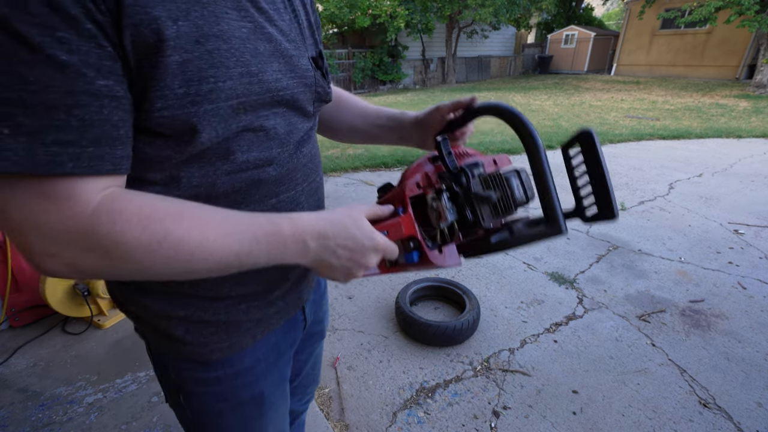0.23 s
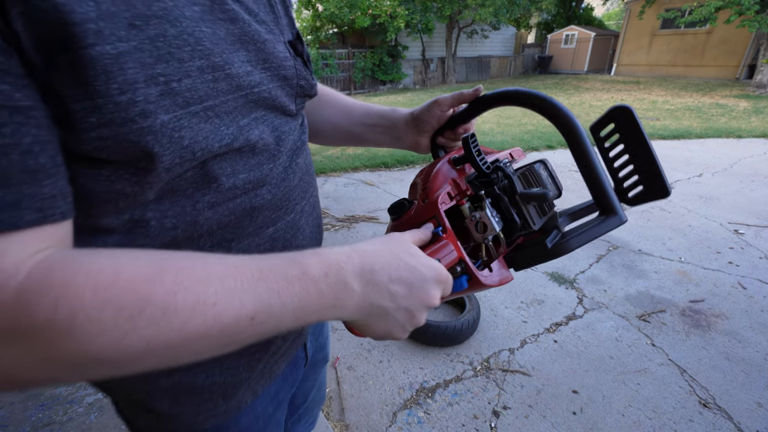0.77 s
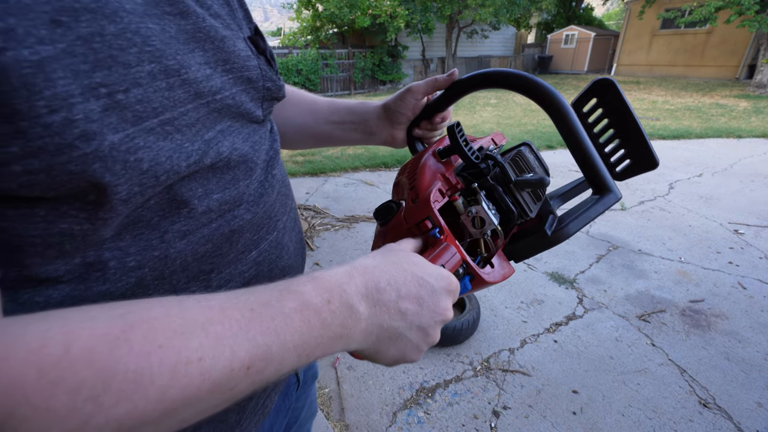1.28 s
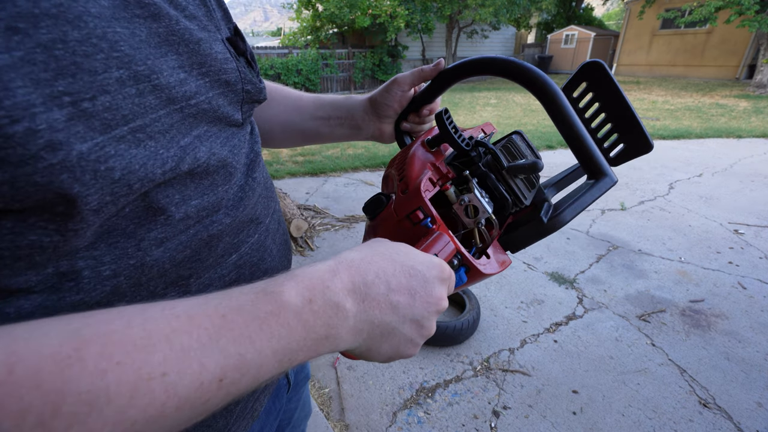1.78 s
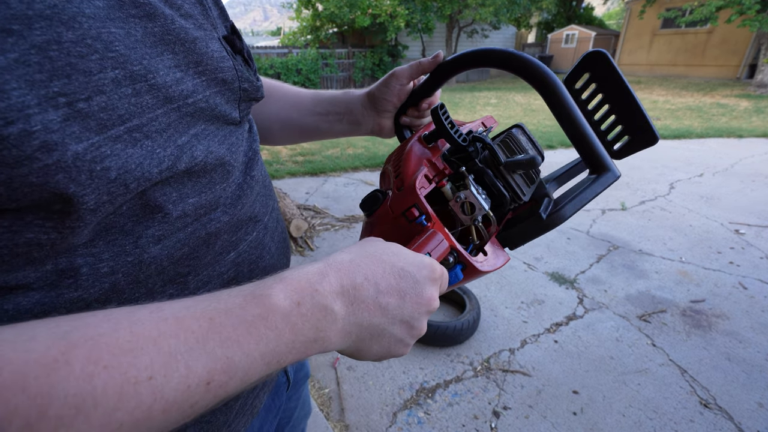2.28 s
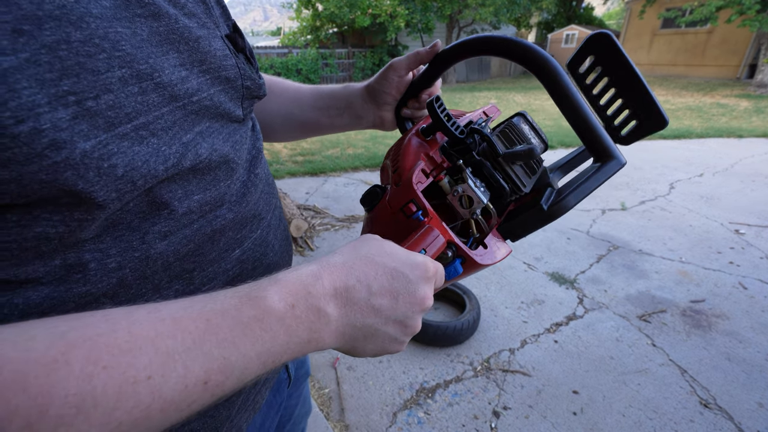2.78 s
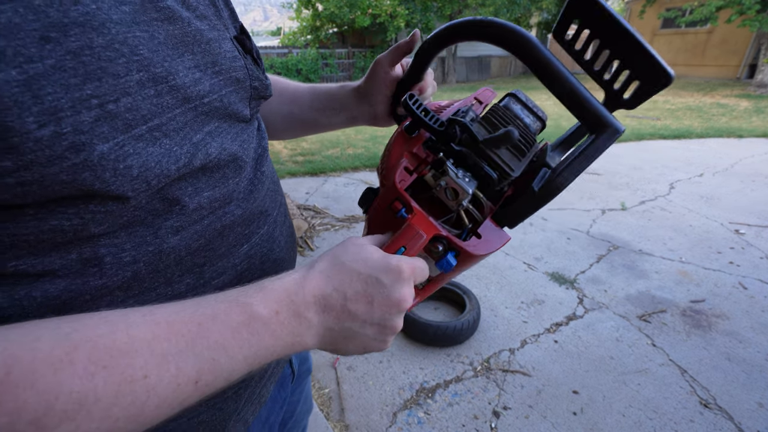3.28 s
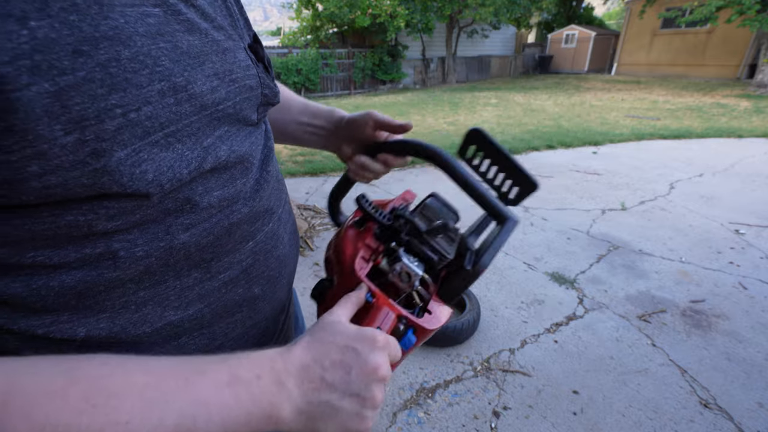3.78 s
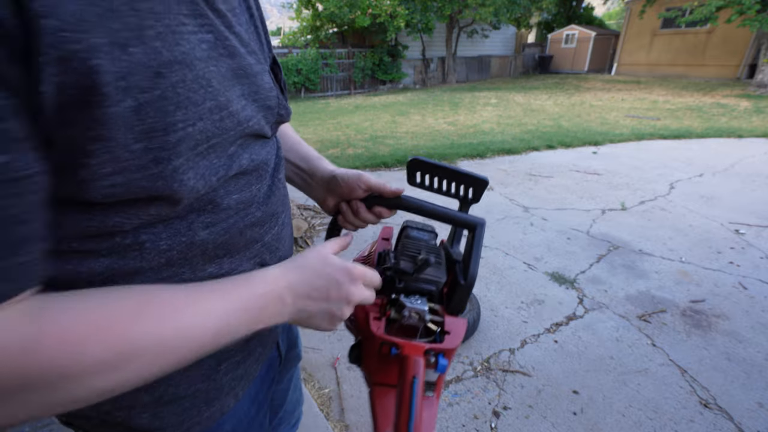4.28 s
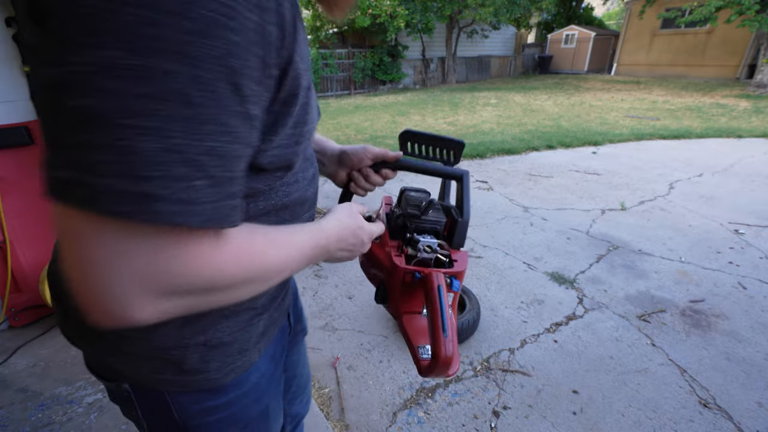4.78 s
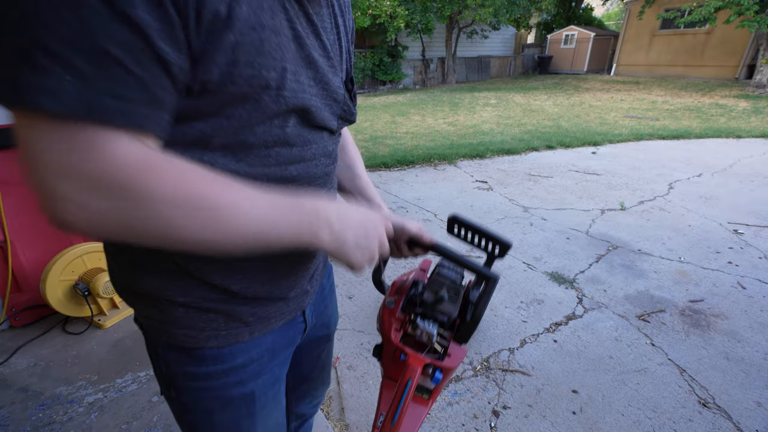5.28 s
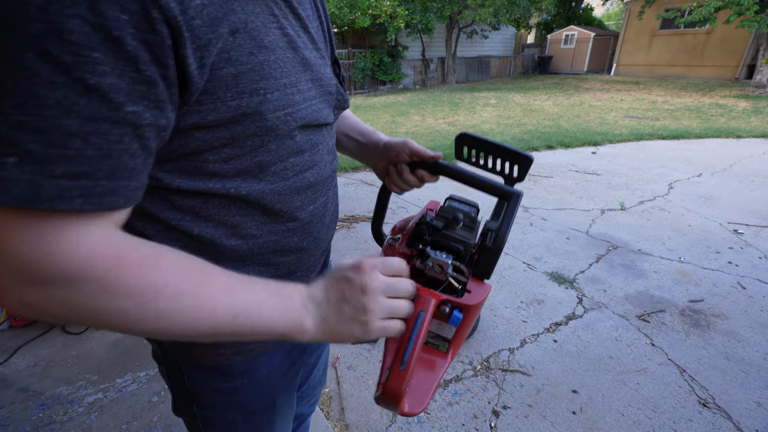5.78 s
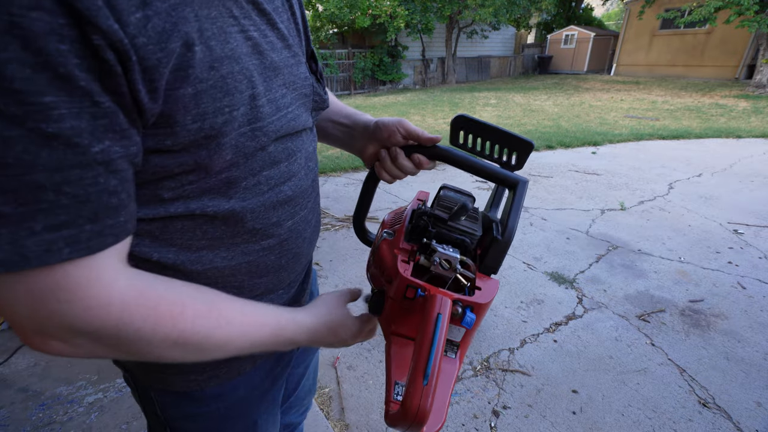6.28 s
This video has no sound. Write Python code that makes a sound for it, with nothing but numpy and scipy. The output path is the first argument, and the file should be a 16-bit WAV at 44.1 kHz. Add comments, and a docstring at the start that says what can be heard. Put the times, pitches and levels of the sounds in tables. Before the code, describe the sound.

Close up in a yard, a small two-stroke engine runs at a fast, buzzing, uneven idle with skipped beats and a rattling casing. The spark is cut; it slows, knocking and puffing, and stops in a clatter of steel with a faint ringing. Quiet handling follows, with a sharp switch click. Then one rasping cord pull starts it again at a slower, rougher idle.

```python
"""A small two-stroke chainsaw without its bar, hand-held over a concrete drive, idles fast and unevenly:
exhaust pulses excite the muffler, shaking parts rattle as filtered noise, the piston hums at crank harmonics.
With the spark cut it coasts down knocking at compression; steel blows clatter and the drum's modes ring on.
Hands slide and knock (noise swells and bursts) and the switch snaps back with a click of filtered noise.
One pull of the cord rasps as gritty noise, the engine catches weakly and idles again, slower."""
import sys
import numpy as np
from scipy import signal
from scipy.fft import rfft, irfft
from scipy.io import wavfile

SR = 44100
rng = np.random.default_rng(int(sys.argv[2]) if len(sys.argv) > 2 else 0)


def waveform_to_disk(signal):
    """Save audio, clipped to [-1, 1], as 16-bit WAV at the path in sys.argv[1]."""
    frames = np.transpose(np.atleast_2d(signal))
    scaled = np.clip(frames, -1, 1) * 32767
    samples = np.round(scaled).astype(np.int16)
    wavfile.write(sys.argv[1], SR, samples)


N = 288414
TIME = np.arange(N) / SR

# instants at which the spark is cut and comes back [s]
IGNITION_OFF, IGNITION_ON = 1.358, 5.01
# first run: the idle sags slowly; without spark, friction brakes the crank ever harder until it stalls
IDLE_HZ, SAG_HZ_PER_S, BRAKE_HZ_PER_S, BRAKE_HZ_PER_S2 = 73.71, 2.587, 65.0, 5.6
FIRST_PORT_S, STALL_S = .0029, 2.025
# second run: the cord spins the crank up to the first burn; it then settles on an idle that creeps upward
PULL_S, FIRST_BURN_S, CATCH_HZ = .0775, 5.0161, 40.4
SETTLE_S, RESTART_IDLE_HZ, CREEP_HZ_PER_S = .1, 58.36, 3.376
# on restarting, burns stay weak below one crank speed and reach full strength at another
WEAK_BELOW_HZ, FULL_ABOVE_HZ, WEAK_DB = 54, 61.1, -4
# a burn just before a stumble loses vigour; per unit of vigour lost, a burn comes later and sounds lower
SLUGGISH, LATE_S, COOLING = 1.3, 0.00017, 0.051
# the rattle grows as a power of crank speed and eases without spark; slack parts knock between two speeds
RATTLE_POWER, RATTLE_COAST_DB, KNOCK_BELOW_HZ, KNOCK_ABOVE_HZ = 1.06, -0.94, 71, 23.5
CLANK_DECAY_S = 0.0095
# the drum is stirred as the crank rocks backward and struck hard as it comes to rest
STIR_S, REST_S, DRUM_STIR_DB, DRUM_STRIKE_DB, DRUM_BEAT_HZ = 2.13, 2.2, -44, -38, 15.6
# the cord swells as it is pulled, holds, and fades as it winds back
CORD_FULL_S, CORD_HOLD_S, CORD_DB = 4.972, .12, -23.5
CORD_RISE_DB_PER_S, CORD_FADE_DB_PER_S = 446, 75
YARD_DB, TOP_HZ = -63.5, 15750

# Spectral outlines of sounds: (frequency [Hz], relative level [dB])
# the muffler's bang in the fast and in the slower idle
FAST_BANG = [(70, -32), (140, -27), (240, -7.5), (400, -3), (600, -5), (760, -0.5), (1030, -4), (1220, -17),
             (2000, -23), (3200, -35), (6000, -45), (15000, -64)]
SLOW_BANG = [(70, -29.5), (190, -7.5), (330, -6), (600, -4), (760, -1), (930, -2.5), (1150, -20.5),
             (2000, -22), (6000, -50), (15000, -71)]
# air sucked or puffed at the port
PUFF = [(50, -32.5), (110, -14), (190, -2.5), (330, 4), (600, -6), (900, 4.5), (1300, -13.5), (2500, -22.5),
        (15000, -59)]
# turbulent exhaust flow
GAS = [(110, -24), (230, 4), (350, -0.5), (950, 1), (1400, -13.5), (2500, -39.5)]
# spitting of the burns and sharp cracks of the running engine
CRACK = [(500, -8.5), (2400, 3), (4000, -9.5), (7000, -17), (11000, -14), (15000, -35)]
# broad rattle of clutch and casing in each run
FIRST_CASING = [(400, -18), (1200, 0.5), (1950, -1.5), (2700, -7.5), (3980, -9), (4700, -4.5),
                (5100, -12.5), (5900, -12.5), (6870, -25.5), (10700, -33), (15500, -44)]
SECOND_CASING = [(400, -16.5), (1200, 1.5), (2000, -3.5), (2430, -5), (3080, -0.5), (3500, -7.5),
                 (5200, -7), (6240, -9.5), (6870, -20), (10700, -31), (15500, -64)]
# slack parts at compression
KNOCK = [(200, -21), (700, -4), (1200, -9), (1800, 0.5), (2300, -10.5), (3000, -16), (4200, -19.5),
         (7000, -30), (15000, -45)]
# blows on steel
STEEL = [(150, -17), (400, -4.5), (1000, -3), (1900, 5), (3000, 0), (4200, 3), (5500, -5.5), (7500, -12.5),
         (10000, -13), (12300, -9.5), (15500, -18)]
# knocks on the housing
CLUNK = [(150, -25), (350, -8), (700, -7), (1200, -0.5), (1600, -2), (2100, -2), (3500, -11.5), (7000, -22),
         (15000, -42.5)]
# hand sliding on plastic
SCUFF = [(700, -5), (1500, 1.5), (3600, 0.5), (6000, -8), (12000, -23)]
# the switch
SWITCH = [(400, -43), (1100, -19), (1700, -11), (2050, 0), (3100, -8.5), (3900, -5), (6000, -1.5),
          (7600, -16.5), (15000, -34)]
# the starter cord
CORD = [(70, -19.5), (190, -4.5), (800, -3.5), (1160, -5), (1750, 3), (2300, -9.5), (3300, -13.5),
        (9300, -26), (15000, -38)]
# quiet outdoor background
YARD = [(30, -14), (122, 0), (700, -4), (1730, -10.5), (2700, -18), (4100, -20), (15000, -34.5)]

# casing resonances: (frequency [Hz], width [Hz], relative level [dB])
CASING_MODES = [(2063, 170, -1), (3100, 180, -8.5), (4730, 32, 4.5), (6400, 22, 0), (7400, 140, 4),
                (10470, 450, 3)]
# clutch drum modes: (frequency [Hz], relative level [dB], t60 [s], strength of the beating twin [0-1])
DRUM_MODES = [(1224, -1.5, 0.55, 0.5), (2309, -4.5, 2.7, 0.64), (4020, 3.5, 0.37, 0), (4360, 2, .24, .1),
              (4511, 3, .57, .1), (5215, 8.5, .16, .1), (6970, -21.5, 1.3, 0.8), (12420, -5, .2, .2)]
# stumbles of both idles: (time [s], length [turns without a burn])
STUMBLES = [(.195, 1), (.304, 1), (.373, 1), (.483, 1), (.565, 2), (.635, 1), (.828, 1), (.899, 1),
            (1.125, 1), (1.209, 1), (5.214, 1), (5.386, 2), (5.486, 1), (5.569, 1), (5.85, 1), (5.899, 2),
            (5.964, 1), (6.029, 2), (6.349, 1), (6.445, 3), (6.523, 1)]
# steel blows as the engine stops, and one faint metal clink during handling:
# (time [s], crack level [dB], ring frequency [Hz], ring level [dB], ring decay [s])
CLANKS = [(2.028, -15.5, 4050, -23, 0.022), (2.068, -28, 1680, -16.5, 0.014), (2.079, -21, 4360, -24, .018),
          (2.088, -24.5, 2000, -12, 0.0043), (2.108, -20.5, 2500, -15.5, .004),
          (2.119, -18.5, 5260, -25, .015), (2.133, -16, 3600, -20.5, .009),
          (2.153, -18.5, 4560, -22.5, 0.028), (2.167, -20.5, 4480, -26.5, 0.031),
          (2.183, -24, 5210, -23.5, .02), (2.198, -19, 1274, -13, 0.01), (2.286, -29, 5250, -32, 0.015),
          (4.607, -56, 5230, -54, 0.029)]
# dull knocks on the housing, from the crank meeting compression or from the hands:
# (time [s], level [dB], decay [s])
THUMPS = [(2.075, -22.5, 0.013), (2.198, -13, 0.014), (2.266, -29, 0.028), (4.132, -53, 0.0065),
          (4.197, -50, 0.0071), (4.37, -46, 0.0034), (4.619, -44, .0062), (4.927, -31.5, 0.0055),
          (4.982, -16.5, 0.013)]
# hands sliding over the plastic: (middle [s], level [dB], half length [s])
SCUFFS = [(3.53, -61.5, 0.054), (4.004, -62, 0.033), (4.55, -69, 0.38)]
# sharp cracks of the running engine, late burns and a knock on the housing:
# (time [s], level [dB], decay [s])
SHARP_CRACKS = [(5.418, -12.5, 0.0022), (5.619, -14.5, 0.0035), (6.412, -17.5, 0.0016)]


def undb(db):
    """Logarithmic level: decibels to amplitude gain."""
    return 10 ** (np.asarray(db) / 20)


def unit(x):
    """Normalisation: scale to rms 1."""
    return x / np.sqrt(np.mean(x ** 2))


def colour(x, points, size=4096):
    """Minimum-phase filtering: unit energy, the given outline, falling 12 dB an octave below it."""
    hz, db = np.transpose(points)
    bins = np.maximum(np.arange(size // 2 + 1), 1) * SR / size
    gain = undb(np.interp(np.log(bins), np.log(hz), db)) * np.minimum(bins / hz[0], 1) ** 2
    # folding the cepstrum onto positive times makes the response causal
    cepstrum = irfft(np.log(gain))
    cepstrum[1:size // 2] *= 2
    cepstrum[size // 2 + 1:] = 0
    response = irfft(np.exp(rfft(cepstrum)))[:size // 2]
    return signal.fftconvolve(x, response / np.linalg.norm(response))[:N]


def resonate(x, hz, width_hz):
    """Simple resonance: a two-pole band-pass with gain 1 at the centre."""
    return signal.lfilter(*signal.iirpeak(hz, hz / width_hz, fs=SR), x)


def impulses(times, sizes):
    """Impulsive excitation: clicks, each shared between two samples."""
    at = np.clip(times * SR, 0, N)
    whole = at.astype(int)
    early = np.bincount(whole, sizes * (1 - at + whole), N + 2)
    late = np.bincount(whole + 1, sizes * (at - whole), N + 2)
    return (early + late)[:N]


def grit(spread_db, size=24):
    """Random excitation: dense tiny impacts of very unequal strength."""
    spread = np.clip(rng.standard_normal(N // size + 1), -2, 2)
    strength = np.repeat(undb(spread_db * spread), size)[:N]
    return unit(rng.standard_normal(N) * strength)


def decay(x, seconds):
    """Exponential damping: give each click a tail."""
    return signal.lfilter([1], [1, -np.exp(-1 / (seconds * SR))], x)


def bursts(rows, points, spread_db):
    """Damped impact noise: blows (time [s], level [dB], decay [s]) break up into fine chatter."""
    envelope = np.zeros(N)
    for s, db, fall in rows:
        start = int(s * SR)
        envelope[start:] += undb(db) * np.exp(-np.minimum(TIME[:N - start] / fall, 20))
    return colour(envelope * grit(spread_db), points)


def yard():
    """Stationary background: steady noise shaped by the outdoor outline."""
    return undb(YARD_DB) * colour(rng.standard_normal(N), YARD)


def sparking(s):
    """Ignition as a gate: whether the spark is on at these times."""
    return (s < IGNITION_OFF) | (s > IGNITION_ON)


def dying_speed():
    """Frictional braking: turns per second of the fast idle and its coast-down."""
    off = np.maximum(TIME - IGNITION_OFF, 0)
    idle = IDLE_HZ - SAG_HZ_PER_S * TIME
    braking = BRAKE_HZ_PER_S * off + BRAKE_HZ_PER_S2 * off ** 2
    return (idle - braking) * (TIME < STALL_S)


def crank(speed, port_s):
    """Integrated rotation: turns made, and the port openings at port_s and once every turn."""
    turns = np.cumsum(speed) / SR
    turns = turns - np.interp(port_s, TIME, turns) % 1
    ports = np.searchsorted(turns, np.arange(int(turns[-1]) + 1), side="right") / SR
    return turns, ports


def stumbled(ports):
    """Misfiring: the turns of this run that each stumble leaves unburnt."""
    missed = np.zeros(len(ports), bool)
    for s, length in STUMBLES:
        if ports[1] < s < ports[-1]:
            first = np.argmin(np.abs(ports - s))
            missed[first:first + length] = True
    return missed


def exhaust(ports, missed, outline, bang_db, puff_db, gas_db, crack_db, muffler_hz, ring_db,
            scatter_db, recovery_db, pump_db=-5):
    """Pulsed source and resonator: burnt charges bang and spit in the muffler, unburnt ones suck air."""
    chance = rng.standard_normal((len(ports), 4)).T
    coasting = ~sparking(ports)
    fired = ~(coasting | missed)
    # vigour drifts over a few turns and sinks before a stumble
    vigour = signal.lfilter([.7], [1, -.6], chance[0]) - SLUGGISH * np.roll(missed, -1)
    strength = fired * undb(scatter_db * vigour + recovery_db * np.roll(missed, 1))

    shape = colour(impulses(np.zeros(1), np.ones(1)), outline)
    shape = (shape + undb(ring_db) * resonate(shape, muffler_hz, 240))[:SR // 20]
    bang, t = np.zeros(N), TIME[:len(shape)]
    # hotter gas carries sound faster, so the pulse is compressed in time
    for s, size, heat in zip(ports - LATE_S * vigour, strength, 1 + COOLING * vigour):
        span = slice(max(int(s * SR), 0), int(s * SR) + len(shape))
        bang[span] += size * np.interp((TIME[span] - s) * heat, t, shape, left=0, right=0)

    # the weaker the burn, the more the cylinder sucks back
    suck = missed * undb(puff_db) + coasting * undb(pump_db)
    suck = suck + fired * undb(puff_db - 10.5) * (chance[2] - vigour)
    puff = colour(impulses(ports + .0004, -suck), PUFF)
    spit = decay(impulses(ports, strength * undb(crack_db + 3.5 * chance[3])), .0018)
    spit = colour(spit * grit(0.75), CRACK)
    flow = decay(impulses(ports, np.where(coasting, .3, 1)), 0.012) * undb(gas_db)
    flow = colour(flow * rng.standard_normal(N), GAS)
    return undb(bang_db) * bang + puff + spit + flow


def rattle(speed, turns, points, level_db, swing_db, peak_turn, spread_db, modes_db):
    """Modulated contact noise: clutch and casing chatter, hardest once a turn and louder with speed."""
    each_turn_db = 1.2 * rng.standard_normal(256)[turns.astype(int)]
    shake = undb(swing_db * np.cos(2 * np.pi * (turns - peak_turn)) + each_turn_db)
    broad = colour(grit(spread_db), points)
    modes = sum(undb(db + modes_db) * resonate(broad, hz, width) for hz, width, db in CASING_MODES)
    level = undb(level_db + RATTLE_COAST_DB * ~sparking(TIME))
    return unit(broad + modes) * shake * (speed / IDLE_HZ) ** RATTLE_POWER * level


def hum(speed, turns, first_db, second_db, reference_hz=70):
    """Unbalanced inertia: the piston shakes the housing at once and twice the crank speed."""
    force = (speed / reference_hz) ** 4
    first = undb(first_db) * np.sin(2 * np.pi * turns)
    second = undb(second_db) * np.sin(4 * np.pi * turns)
    return force * (first + second)


def pumping(speed, turns, missed, pump_db, blow_turn=-0.058, blow_width_turn=0.024, blow_db=-3,
            suck_s=0.00065, suck_width_s=0.0003, lowest_hz=170):
    """Volume-flow source: unfired turns blow, then suck sharply; the gusts part as the crank slows."""
    angle = (turns + .5) % 1 - .5
    since_port = angle / np.maximum(speed, 1)
    blow = undb(blow_db) * np.exp(-.5 * ((angle - blow_turn) / blow_width_turn) ** 2)
    suck = np.exp(-.5 * ((since_port - suck_s) / suck_width_s) ** 2)
    unfired = ~sparking(TIME) | np.isin(np.round(turns), np.flatnonzero(missed))
    stroke = (blow - suck) * (unfired & (speed > 0))
    # the small outlet radiates little bass
    highpass = signal.butter(2, lowest_hz, "high", fs=SR, output="sos")
    return undb(pump_db) * signal.sosfiltfilt(highpass, stroke)


def compression(speed, turns, lead_turn=0.34, width_turn=0.11, knock_db=-18.0, ring_db=-16,
                ring_hz=1830, wander=.07, growth=0.6, scatter_db=1.7):
    """Periodic impact: compression knocks slack parts, ringing at a new pitch, harder as the crank slows."""
    stroke = turns + lead_turn + .5
    force, pitch = rng.standard_normal((256, 2))[stroke.astype(int)].T
    slowing = np.maximum(1 - speed / KNOCK_BELOW_HZ, 0) ** growth * (speed > KNOCK_ABOVE_HZ)
    pulse = np.exp(-.5 * ((stroke % 1 - .5) / width_turn) ** 2)
    push = slowing * undb(scatter_db * force) * pulse
    ring = np.sin(2 * np.pi * np.cumsum(ring_hz * (1 + wander * pitch)) / SR)
    return undb(knock_db) * colour(push * grit(2.7), KNOCK) + undb(ring_db) * push * ring


def first_run():
    """Superposition: a fast idle that skips burns, then coasts down knocking."""
    speed = dying_speed()
    turns, ports = crank(speed, FIRST_PORT_S)
    missed = stumbled(ports)
    burns = exhaust(ports, missed, FAST_BANG, bang_db=7.5, puff_db=0.5, gas_db=-28.5, crack_db=-30.5,
                    muffler_hz=914, ring_db=-4.5, scatter_db=0.83, recovery_db=-1.5)
    casing = rattle(speed, turns, FIRST_CASING, level_db=-26, swing_db=1.0, peak_turn=0.063,
                    spread_db=1.5, modes_db=2.5)
    piston = hum(speed, turns, first_db=-46, second_db=-57.5)
    gusts = pumping(speed, turns, missed, pump_db=-12.5)
    return burns + casing + piston + gusts + compression(speed, turns)


def clanks():
    """Impact and free vibration: each metal blow cracks, and the part hit rings at its own pitch."""
    out = bursts([(s, db, CLANK_DECAY_S) for s, db, *_ in CLANKS], STEEL, spread_db=1.0)
    t = TIME[:SR // 4]
    for s, _, hz, db, fall in CLANKS:
        start = int(s * SR)
        out[start:start + len(t)] += undb(db) * np.exp(-t / fall) * np.sin(2 * np.pi * hz * t)
    return out


def gasps():
    """Suction pulses: the barely turning piston gasps through the port."""
    return colour(impulses(np.array([2.042, 2.133, 4.984]), -undb([2, -1, 2])), PUFF)


def thumps(cover_hz=1210, cover_db=-2):
    """Struck shell: dull knocks on the housing excite a resonance of its cover."""
    housing = bursts(THUMPS, CLUNK, spread_db=-1.5)
    return housing + undb(cover_db) * resonate(housing, cover_hz, 140)


def drum():
    """Split modes: the struck steel drum is not quite round, so its ringing modes beat in pairs."""
    s, ring_db = np.transpose([(STIR_S, DRUM_STIR_DB), (REST_S, DRUM_STRIKE_DB)])
    phase = 2 * np.pi * (TIME - REST_S)
    out = 0
    for hz, db, t60, twin in DRUM_MODES:
        # the energies of successive blows add up
        energy = decay(impulses(s, undb(ring_db) ** 2), t60 / np.log(1e6))
        pair = np.sin(hz * phase) + twin * np.sin((hz + DRUM_BEAT_HZ) * phase)
        out = out + undb(db) * np.sqrt(energy + 1e-18) * pair
    return out


def scuffs():
    """Sliding friction: each slide of a hand is noise that swells and fades."""
    swells = sum(undb(db) * np.exp(-((TIME - s) / half) ** 2) for s, db, half in SCUFFS)
    return swells * colour(grit(3.1), SCUFF)


def switch():
    """Snap action: the switch springs back with a sharp click and a faint tail."""
    return bursts([(3.708, -15.5, 0.0015), (3.712, -49, 0.026)], SWITCH, spread_db=0)


def cord():
    """Frictional noise: the starter cord rasps out of its pulley and winds back."""
    early = np.maximum(CORD_FULL_S - TIME, 0)
    late = np.maximum(TIME - CORD_FULL_S - CORD_HOLD_S, 0)
    level = undb(CORD_DB - CORD_RISE_DB_PER_S * early - CORD_FADE_DB_PER_S * late)
    return level * colour(grit(4.2), CORD)


def starting_speed():
    """Exponential approach: turns per second of the pull, the catch and the slower idle."""
    since = TIME - FIRST_BURN_S
    pulled = CATCH_HZ * np.maximum(1 + since / PULL_S, 0)
    shortfall = (RESTART_IDLE_HZ - CATCH_HZ) * np.exp(-np.abs(since) / SETTLE_S)
    running = RESTART_IDLE_HZ + CREEP_HZ_PER_S * since - shortfall
    return np.where(since < 0, pulled, running)


def second_run():
    """Superposition: the engine catches weakly, gathers speed and idles with stumbles and sharp cracks."""
    speed = starting_speed()
    turns, ports = crank(speed, FIRST_BURN_S)
    missed = stumbled(ports)
    catching = undb(np.interp(speed, [WEAK_BELOW_HZ, FULL_ABOVE_HZ], [WEAK_DB, 0]))
    burns = exhaust(ports, missed, SLOW_BANG, bang_db=6.5, puff_db=0.0, gas_db=-25.5, crack_db=-22,
                    muffler_hz=720, ring_db=-1.0, scatter_db=1.0, recovery_db=0.5)
    casing = rattle(speed, turns, SECOND_CASING, level_db=-25.5, swing_db=1.7, peak_turn=0.036,
                    spread_db=1.0, modes_db=-1.0)
    piston = hum(speed, turns, first_db=-59, second_db=-38.0)
    gusts = pumping(speed, turns, missed, pump_db=-15)
    sharp_cracks = bursts(SHARP_CRACKS, CRACK, spread_db=-7.0)
    return catching * burns + casing + piston + gusts + sharp_cracks


def pawls():
    """Impact noise: the starter pawls strike steel once."""
    return bursts([(5.023, -11.5, 0.016)], STEEL, spread_db=-1.5)


def outdoors(x, ground_s=.0058, ground_db=-15, walls_db=-27, walls_t60=.36):
    """Reflection: one bounce off the concrete and a faint, dull scatter from house and fence."""
    bounce = np.interp(TIME - ground_s, TIME, x, left=0)
    t = TIME[:SR // 2]
    tail = rng.standard_normal(len(t)) * undb(-60 * t / walls_t60) * (1 - np.exp(-t / 0.0064))
    walls = signal.fftconvolve(x, tail / np.linalg.norm(tail))[:N]
    dull = signal.sosfilt(signal.butter(2, 6000, fs=SR, output="sos"), walls)
    return x + undb(ground_db) * bounce + undb(walls_db) * dull


def scene():
    """Superposition: two runs of the engine with the quiet yard between them."""
    saw = first_run() + clanks() + gasps() + thumps() + drum()
    saw = saw + scuffs() + switch() + cord() + second_run() + pawls()
    return (outdoors(saw) + yard())[None]


def record(dry, ceiling=0.69):
    """Saturation and band limit: the microphone rounds the highest peaks; the top is cut."""
    rounded = ceiling * dry / (ceiling ** 4 + dry ** 4) ** (1 / 4)
    return signal.sosfilt(signal.ellip(8, .2, 70, TOP_HZ, fs=SR, output="sos"), rounded)


dry = scene()
out = record(dry)
waveform_to_disk(out)
```